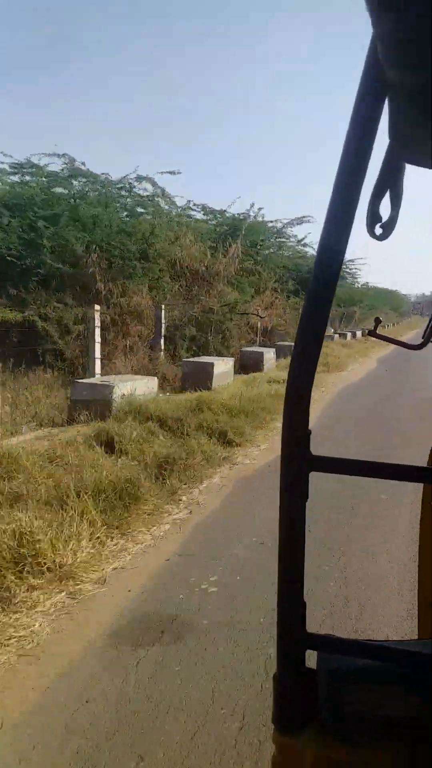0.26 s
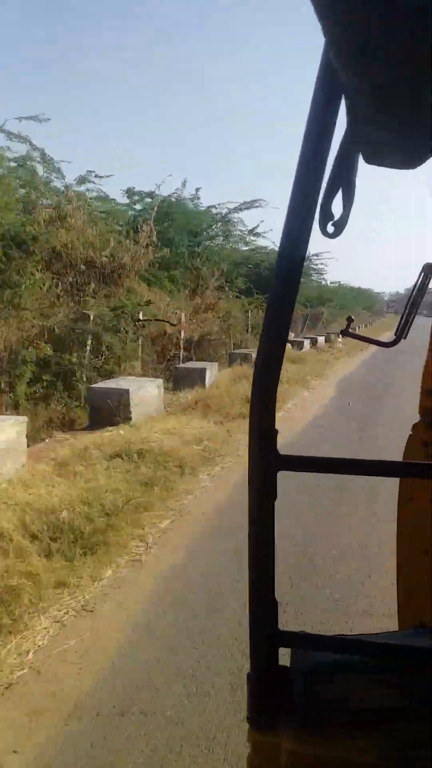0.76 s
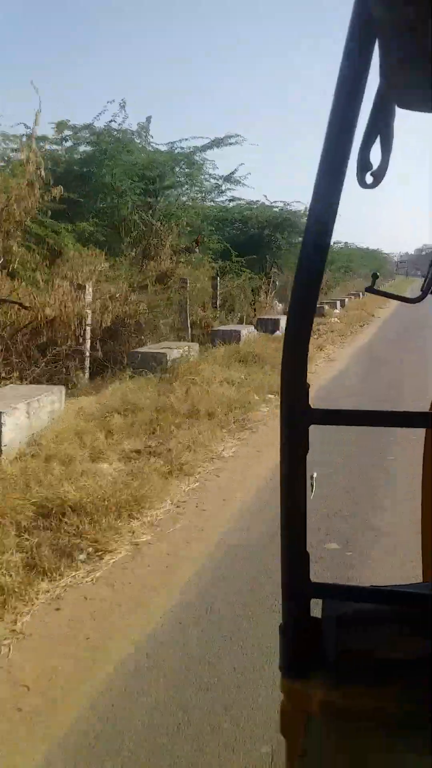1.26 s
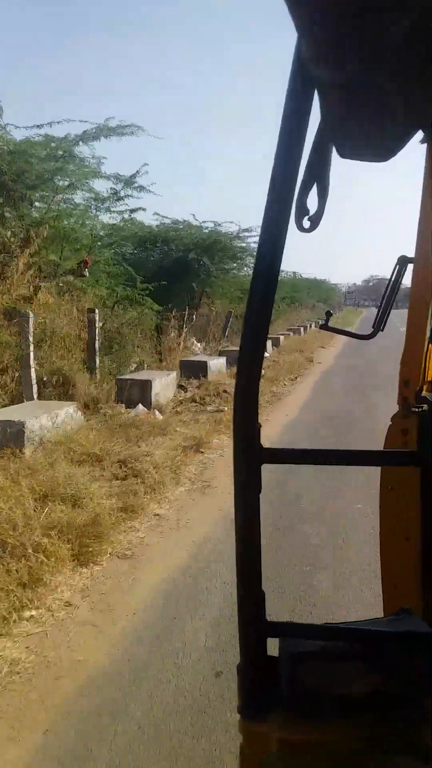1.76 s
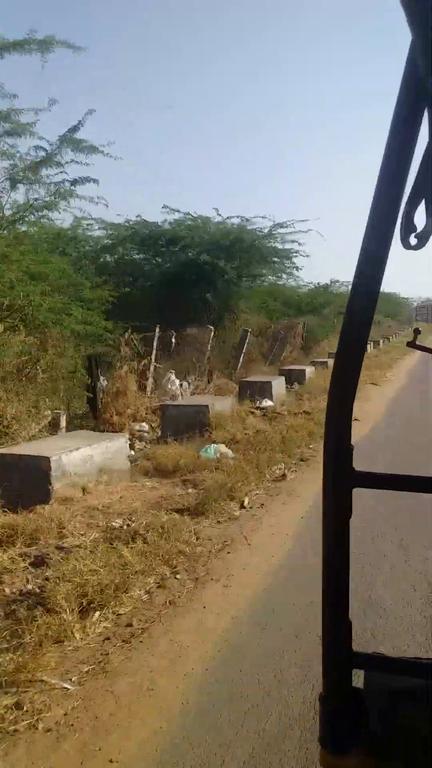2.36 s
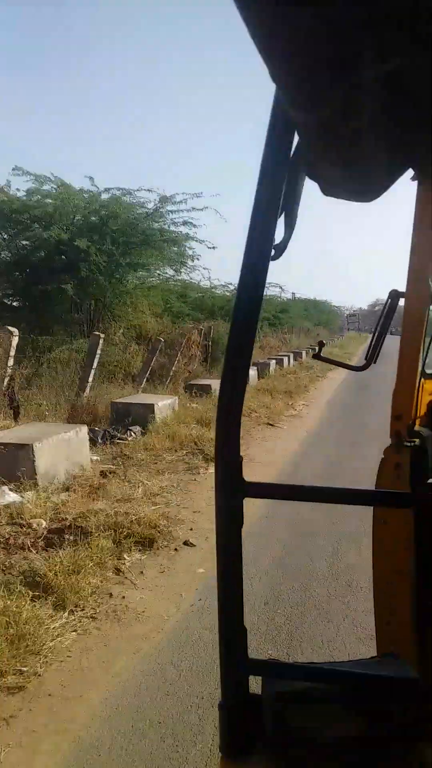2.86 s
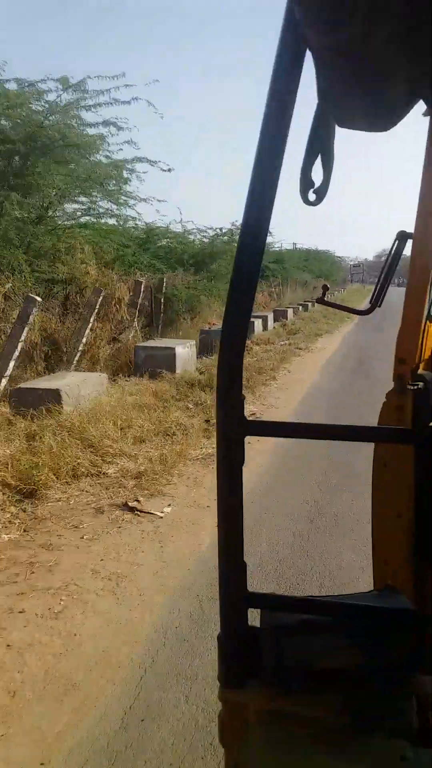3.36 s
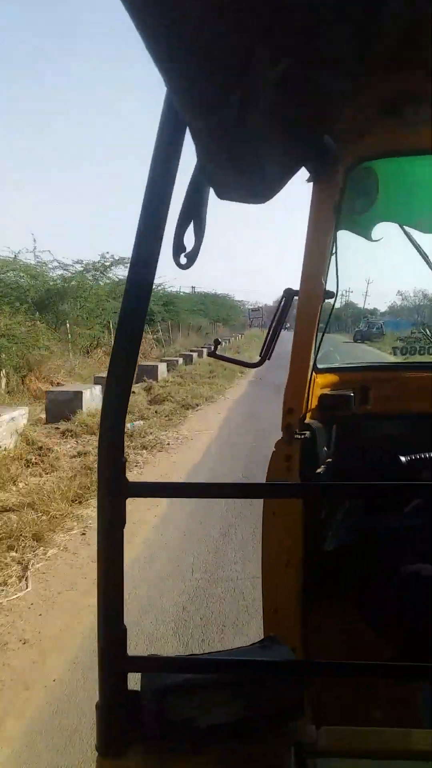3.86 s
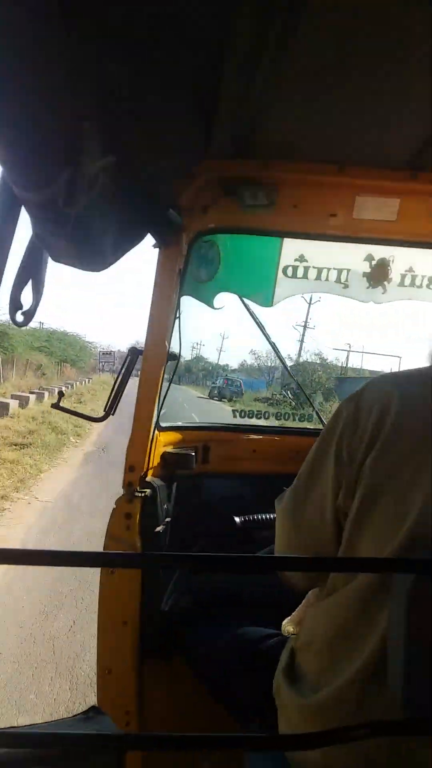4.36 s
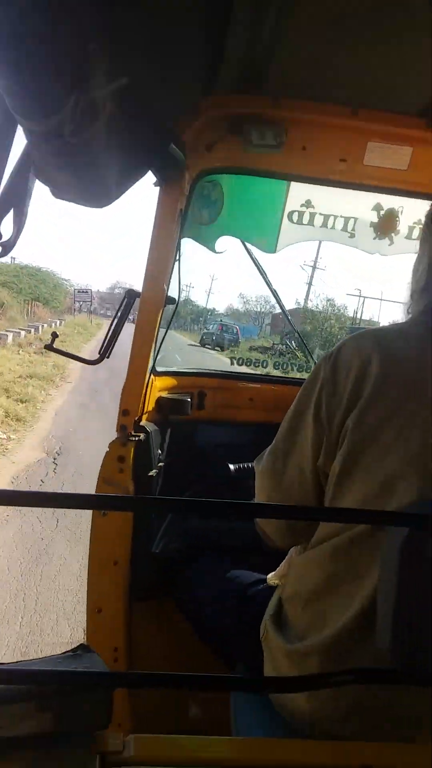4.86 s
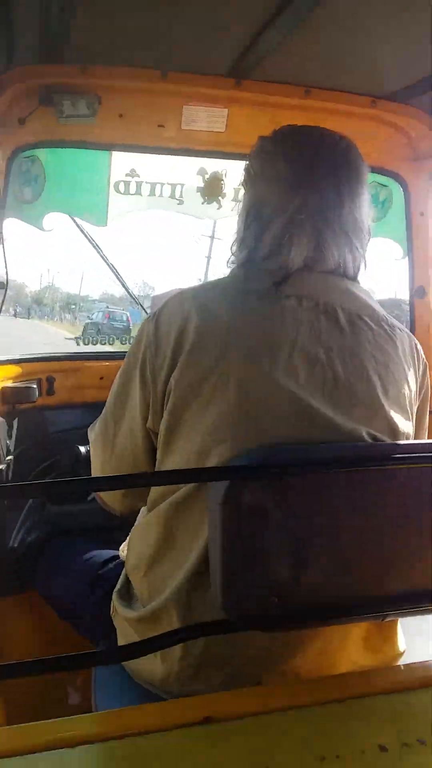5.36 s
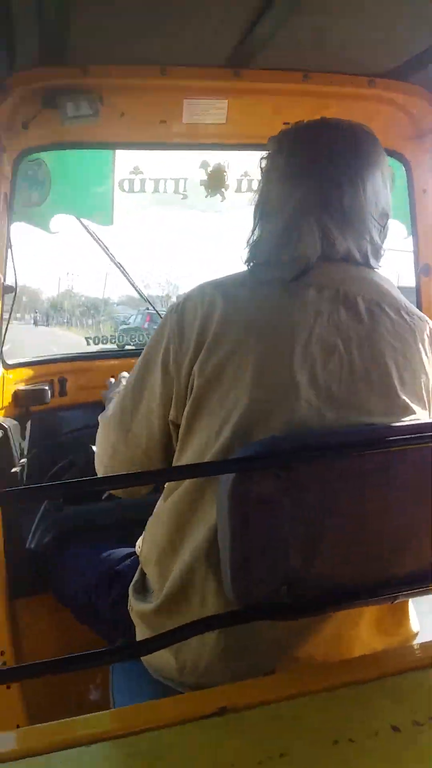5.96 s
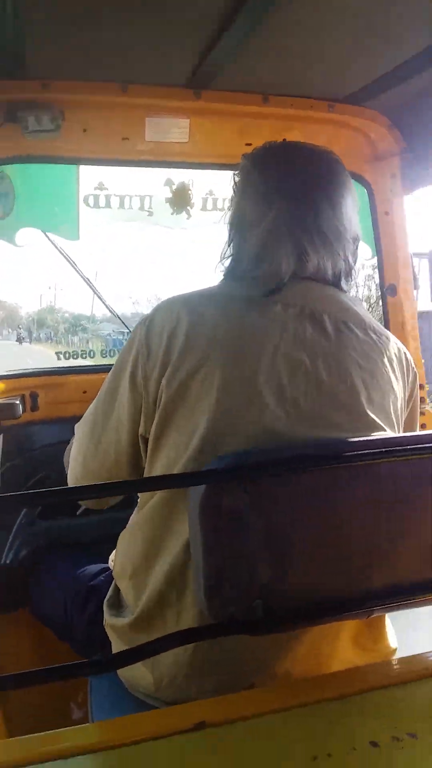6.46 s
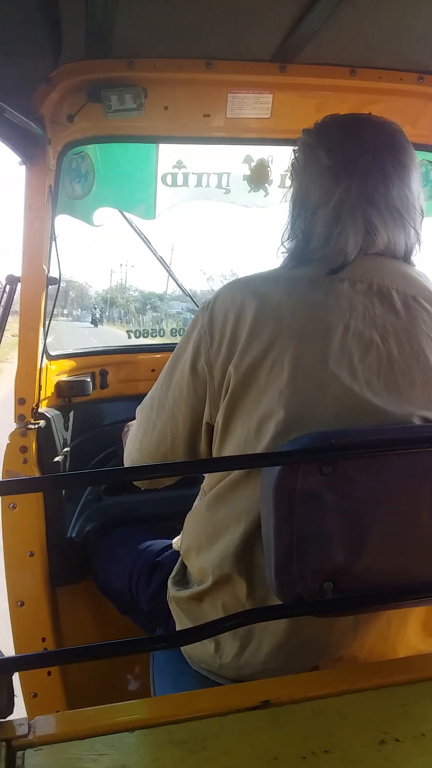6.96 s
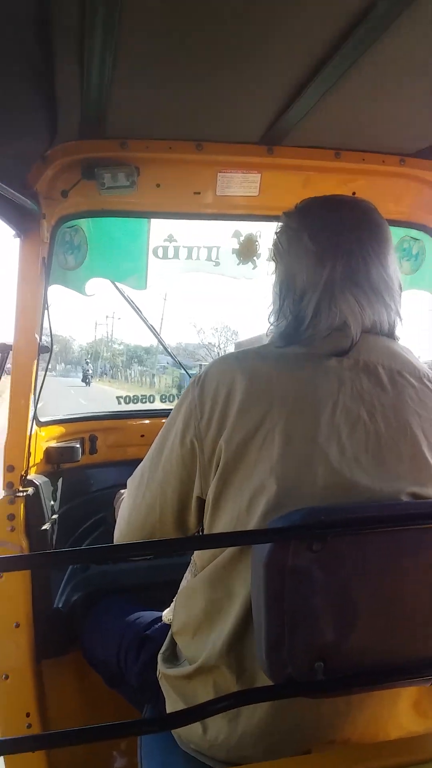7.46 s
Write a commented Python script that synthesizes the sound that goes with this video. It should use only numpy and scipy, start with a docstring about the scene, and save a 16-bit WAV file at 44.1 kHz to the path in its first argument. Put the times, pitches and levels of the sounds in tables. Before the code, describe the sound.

From the passenger bench of an open three-wheeler, a small single-cylinder engine drones steadily with a rapid putter and metallic panel clatter. Tyre and air hiss lies underneath. Wind rumbles on the phone microphone and hits it in short, irregular, distorted bumps, thickest around one second, four to five seconds and just before seven. The engine eases slightly at the end.

```python
"""The open cabin of an auto-rickshaw cruising along a country road, heard from the passenger bench.
The single-cylinder engine drones in harmonics of its firing rate and clatters through casing and panel resonances.
Tyre and air noise is a shaped hiss; small fittings tick in short bursts of thin noise.
The slipstream carries eddies past the microphone: they rumble, and hit it in short, ragged buffets
that run into the limiter."""
import sys
import numpy as np
from scipy import signal
from scipy.fft import rfft, irfft
from scipy.io import wavfile
from scipy.ndimage import uniform_filter1d, minimum_filter1d, map_coordinates

SR = 44100
rng = np.random.default_rng(int(sys.argv[2]) if len(sys.argv) > 2 else 0)


def output_pcm(signal):
    """Save a mono or channel-first signal as 16-bit PCM at the path in sys.argv[1].

    Samples are clipped to [-1, 1] before scaling.
    """
    pcm = np.clip(np.atleast_2d(signal).T, -1, 1) * 32767
    wavfile.write(sys.argv[1], SR, np.round(pcm).astype(np.int16))


N = 339129   # length of the scene in samples
EDDY_SIZE = 32   # scale of the eddy patterns in samples

# Gusts that hit the microphone. Each row: nominal time in seconds, relative level in dB,
# corner frequency in Hz, length in seconds, relative level of the dull wake in dB.
BUFFETS = [(0.001, -19, 790.0, 0.0092, -10.5), (0.166, -17, 1067, 0.0019, -8),
           (0.396, -13, 710.0, 0.0046, -5), (0.482, -9.5, 1210, 0.008, -17),
           (0.589, -13.5, 1302, 0.016, -5), (0.735, -4.5, 1020, 0.006, -4.5), (0.792, -15, 492, 0.0027, -7),
           (0.846, -1.0, 1121, 0.017, -2.5), (0.896, -11, 1320, 0.0016, -10),
           (0.97, -5.5, 370.0, 0.0021, -10), (1.041, -12, 1190, 0.02, -10), (1.079, -2.5, 1444, 0.013, -3),
           (1.17, -5.5, 803, 0.0024, -3), (1.516, -6.5, 1014, 0.0095, -1), (1.571, -7.5, 604, 0.0053, -9),
           (1.811, -10, 807, 0.0038, 1), (2.029, -7.5, 749.4, 0.0022, -12),
           (2.161, -5.5, 1469, 0.014, -3.5), (2.263, -7.5, 837, 0.009, -9),
           (2.324, -5.5, 1490.0, 0.005, -4.5), (2.503, -4.5, 1108, 0.0035, -1.5),
           (2.763, -10, 1006, 0.0017, -2.0), (3.044, -14.5, 885, 0.002, -4.5),
           (3.138, -11.5, 965, 0.0089, -4), (3.277, -8.5, 715, 0.03, -5.5),
           (3.457, -11.5, 854.5, 0.012, -20), (3.771, -8.5, 1163, 0.0077, -14.0),
           (3.998, -12.5, 676, 0.013, -1), (4.059, -4.5, 1046, 0.0028, -3), (4.092, -3.5, 1114, 0.0058, 1),
           (4.189, -5.5, 1077, 0.006, -5), (4.225, -10, 589, 0.0027, 0), (4.299, -12, 1024, 0.0047, -4.5),
           (4.459, -11, 920, 0.006, -7.5), (4.643, -14.5, 1439, 0.002, 1.0), (4.852, -5, 528, 0.006, -3),
           (4.933, -4.5, 1388, 0.004, -8.5), (5.002, -4.5, 1585, 0.0083, 5), (5.11, -5, 1256, 0.019, 3.5),
           (5.144, -1, 973, 0.02, -1.0), (5.532, -6, 867, 0.0022, -11), (5.609, -12, 813, 0.0038, -10),
           (5.705, -6.5, 684, 0.011, -1.5), (5.863, -15, 893, 0.002, -9), (6.321, -8.5, 1028, 0.0034, -7),
           (6.354, -6.5, 797, 0.0054, -5), (6.401, -3.5, 603, 0.0059, -7.5),
           (6.523, -7.5, 1097, 0.0035, -1), (6.658, -3.5, 1563, 0.014, 5.5), (6.771, -1.5, 1263, 0.01, 7.5),
           (6.836, -6, 551, 0.0041, -5), (6.94, 0, 1235, 0.02, -2), (6.976, -10, 1534, 0.0093, -3),
           (7.067, -9.0, 1240, 0.0028, -28), (7.172, -11, 1079, 0.0068, -10),
           (7.445, -5.0, 1255, 0.0065, -0.5)]


def from_db(db):
    """Amplitude factor for a level in dB."""
    return 10 ** (np.asarray(db) / 20)


def rms_one(x):
    """Scale a signal to an rms of 1."""
    return x / np.sqrt(np.mean(x ** 2) + 1e-20)


def in_time(rows):
    """One curve per column after the first (seconds), interpolated sample by sample."""
    s, *columns = np.transpose(rows)
    return [np.interp(np.arange(N) / SR, s, column) for column in columns]


def butter(x, hz, kind, order):
    """Causal low- or high-pass."""
    return signal.sosfilt(signal.butter(order, hz, kind, fs=SR, output="sos"), x)


def drift(rate_hz):
    """Slow chance with a spread of 1: noise that falls off above the given rate."""
    hz = np.arange(N // 2 + 1) * SR / N
    return rms_one(irfft(rfft(rng.standard_normal(N)) / (1 + (hz / rate_hz) ** 2), N))


def coloured_noise(spectrum):
    """Noise with the given spectrum, interpolated over log frequency; rms 1."""
    hz = np.arange(1, N // 2 + 2) * SR / N   # starts above 0 for the logarithm
    points_hz, points_db = np.transpose(spectrum)
    gain = from_db(np.interp(np.log(hz), np.log(points_hz), points_db))
    return rms_one(irfft(rfft(rng.standard_normal(N)) * gain, N))


def resonate(x, hz, width_hz):
    """One resonance with gain 1 on top."""
    r = np.exp(-np.pi * width_hz / SR)
    numerator = [(1 - r * r) / 2, 0, (r * r - 1) / 2]
    return signal.lfilter(numerator, [1, -2 * r * np.cos(2 * np.pi * hz / SR), r * r], x)


def through(force, modes):
    """A bank of resonances side by side, with alternating sign."""
    out = np.zeros(N)
    for k, (hz, width_hz, db) in enumerate(modes):
        out += (-1) ** k * from_db(db) * resonate(force, hz, width_hz)
    return out


def road_noise(hiss_db):
    """Tyre and air noise: a steady spectrum whose level follows the ride."""
    # Each row: frequency in Hz, relative level per Hz in dB.
    road_spectrum = [(60, 23.5), (200, 31.5), (600, 22), (1300, 14), (2200, 15), (2800, 5), (3700, 5.5),
                     (4600, 0.5), (6300, -3.5), (7700, 0), (10000, 8), (12500, 0), (15500, -7)]
    return from_db(hiss_db + 20.5) * coloured_noise(road_spectrum)


def ticks(level_db, t60, low_hz):
    """Small metal parts touch with a short, thin crack; each falls by 60 dB in t60 seconds."""
    # Each row: start in seconds, relative level in dB.
    touches = [(2.617, -48), (4.948, -43), (5.8691, -45.5), (7.1133, -46)]
    out, age = np.zeros(N), np.arange(SR // 20) / SR
    for s, db in touches:
        start = int(s * SR)
        decay = from_db(db + level_db - 60 * age / t60)
        out[start:start + len(age)] += decay * rng.standard_normal(len(age))
    return butter(out, low_hz, "high", order=2)


def drone(cycle, level_db, waver_db, wobble):
    """Exhaust and cabin: harmonics of the firing rate; each wavers as the load and the cabin shake."""
    # Each row: multiple of the firing rate, relative rms level in dB.
    harmonics = [(2, -45), (3, -50.5), (4, -37), (5, -33.5), (6, -39), (7, -36), (8, -42), (9, -49),
                 (11, -32.5), (12, -47), (13, -35), (15, -46.5), (16, -49.5), (18, -44.5), (20, -42.5)]
    out = np.zeros(N)
    turned = cycle + wobble * drift(2.4)
    for multiple, db in harmonics:
        level = from_db(db + waver_db * drift(4.9))
        out += level * np.sin(2 * np.pi * (multiple * turned + rng.random()))
    return from_db(level_db) * np.sqrt(2) * out


def knock(cycle, at, length):
    """A rounded burst once a cycle, centred on the share `at` of it."""
    distance = (cycle - at + .5) % 1 - .5
    return np.exp(-.5 * (distance / length) ** 2)


def clatter(cycle, valve_db, between_db, uneven_db, direct_db, panels_db):
    """Combustion knock and valve gear shake casing and panels, a little differently on every stroke."""
    # Ringing of the engine casing and panels. Each row: frequency in Hz, width in Hz, relative level in dB.
    casing_modes = [(460, 66, 7), (666, 100, -11), (1084, 140, -7), (1653, 380, -1), (2007, 320, -2),
                    (2393, 127, 0.5), (3013, 300, -7.5), (3847, 154, -4), (5770, 96, -18),
                    (8200, 610, -42.5)]
    # Panels that sing inside the cabin. Each row: frequency in Hz, width in Hz, relative level in dB.
    panel_modes = [(561, 9.1, 5), (725, 20, 0), (1170, 21, -10.5), (1902, 17, -0.5), (1933, 5.3, -5),
                   (2290, 35, -18.5)]
    # How far the microphone faces into the cabin. Each row: time in seconds, share from 0 to 1.
    facing_curve = [(0, 0.95), (3.8, 0.28), (5.2, 0.73), (7.69, 1)]
    combustion = knock(cycle, at=0.37, length=0.074)
    valves = from_db(valve_db) * knock(cycle, at=0.66, length=0.18)
    strokes = (combustion + valves) * from_db(uneven_db * drift(25))
    force = (strokes + from_db(between_db)) * rng.standard_normal(N)
    casing = rms_one(through(force, casing_modes) + from_db(direct_db) * force)
    panels = rms_one(through(force, panel_modes))
    return casing + from_db(panels_db) * in_time(facing_curve)[0] * panels


def engine(clatter_db):
    """One firing cycle drives both the tonal drone and the noisy clatter."""
    # Engine speed. Each row: time in seconds, firings per second.
    firing_curve = [(0, 23.8), (.75, 21.5), (1.25, 23), (2.75, 23.1), (3.8, 23.1), (5.2, 24.6), (6, 22.6),
                    (7.69, 20.6)]
    cycle = np.cumsum(in_time(firing_curve)[0]) / SR
    tonal = drone(cycle, level_db=-2.04, waver_db=4.0, wobble=0.0018)
    rattling = clatter(cycle, valve_db=-1.0, between_db=0.0, uneven_db=-3.5, direct_db=-19.5, panels_db=-3.5)
    return tonal + from_db(clatter_db + 0.66) * rattling


def eddies(swirl, corner_hz, largest, finest):
    """Frozen eddy patterns, one a row, are carried past the port: the faster the flow, the higher the corner."""
    corner = SR / EDDY_SIZE   # corner of the pattern when carried at one sample per sample
    pattern = butter(swirl, corner, "low", order=3)
    pattern = butter(pattern, largest * corner, "high", order=1)
    pattern = butter(pattern, finest * corner, "low", order=3)   # viscosity wipes out the finest swirls
    rows, length = pattern.shape
    travelled = np.cumsum(corner_hz, axis=1) / corner % length
    travelled = travelled + length * np.arange(rows)[:, None]   # rows lie end to end
    return map_coordinates(pattern.ravel(), [travelled], order=1)


def rumble(level_db, corner_hz, lumpy_db, brightening):
    """The restless slipstream: pressure goes with the square of its speed, and gusts are brighter."""
    flow = from_db(lumpy_db * np.tanh(drift(40.12) / 2))
    gust = from_db(brightening * (level_db - level_db.mean()))
    swirl = rng.standard_normal((1, N))
    pressure = flow ** 2 * eddies(swirl, [corner_hz * flow * gust], largest=0.21, finest=4.15)[0]
    return from_db(level_db) * rms_one(pressure)


def stray_eddies(wind_db, above_db, spread_db, corner_hz, octaves, scatter_s, count=280):
    """Small eddies flock around the big ones, stronger in the gusts: rows (s, level dB, corner Hz)."""
    strength, fineness = rng.uniform(-0.88, 1, (2, count))
    s = np.resize(np.array(BUFFETS)[:, 0], count) + rng.laplace(0, scatter_s, count)
    s = np.clip(s, 0, (N - 1) / SR)
    db = wind_db[(s * SR).astype(int)] + above_db + spread_db * strength
    return np.column_stack([s, db, corner_hz * 2 ** (octaves * fineness)])


def break_up():
    """Each buffet arrives as a handful of eddies of different size: rows (s, level dB, corner Hz)."""
    s, db, corner_hz, length, wake_db = np.transpose(BUFFETS)
    octaves = np.log2(corner_hz / 1000)
    lead = [s, db - 1.5, corner_hz]
    # part of the way through, the flow tears with a fine crackle, stronger in bright buffets
    tear = [s + 0.6 * length, db - 14 + 10 * octaves, corner_hz * 2 ** 0.74]
    trail = [s + length, db - 1.4, corner_hz * 2 ** -0.25]
    wake = [s + 0.3965 * length, wake_db, np.full(len(s), 235.3)]   # large and dull
    late_s = 0.016 * rng.uniform(.5, 1.5, len(s))
    straggler = [s + length + late_s, db - 9.5, corner_hz * 2 ** -0.55]
    return np.hstack([lead, tear, trail, wake, straggler]).T


def buffets(rows, level_db, rise_s, life_s, life_law, slowing, front_db):
    """Each eddy builds quickly to a pressure front, then its wake slows and dies; small, bright eddies die soonest."""
    s, db, corner_hz = np.transpose(rows)[:, :, None]
    lead = SR // 80   # samples ahead of the front
    age = np.arange(-lead, SR // 24) / SR
    life = life_s * (600 / corner_hz) ** life_law
    swell = np.exp(np.minimum(age / rise_s, -age / life))
    speed = corner_hz * swell ** slowing
    swirl = rng.standard_normal(swell.shape)
    # place one strong swirl where the flow has carried the pattern by age 0
    front = (speed[:, :lead].sum(axis=1) * EDDY_SIZE / SR).astype(int)
    swirl[np.arange(len(rows)), front] = rng.choice([-1, 1], len(rows)) * from_db(front_db)
    pressure = swell * eddies(swirl, speed, largest=0.066, finest=7.0)
    # give each burst the energy of its swell
    energy_match = np.linalg.norm(swell, axis=1) / np.linalg.norm(pressure, axis=1)
    pressure *= from_db(db + level_db) * energy_match[:, None]
    starts = (np.maximum(s[:, 0] + rise_s / 2, 0) * SR).astype(int)
    out = np.zeros(N + SR)
    for start, burst in zip(starts, pressure):
        out[start:start + len(age)] += burst
    return out[lead:lead + N]


def slipstream():
    """Wind at the microphone: a rumble between the buffets, the broken-up buffets and stray eddies."""
    # Strength of the slipstream. Each row: time in seconds, relative level in dB.
    wind_curve = [(0.0, -25), (0.23, -26), (0.51, -20.5), (0.96, -19), (1.24, -24), (2.01, -25),
                  (2.21, -22), (3.19, -26), (4.09, -21), (4.48, -23), (4.95, -19), (5.31, -24), (6.15, -27),
                  (6.55, -20), (6.9, -18.5), (7.37, -23), (7.5, -27), (7.69, -28)]
    wind_db = in_time(wind_curve)[0]
    wind = rumble(wind_db - 0.2, corner_hz=214.9, lumpy_db=4.5, brightening=.3)
    strays = stray_eddies(wind_db, above_db=1.0, spread_db=8.5, corner_hz=797.3, octaves=.8, scatter_s=.06)
    passing = np.vstack([break_up(), strays])
    return wind + buffets(passing, level_db=-3.5, rise_s=.003, life_s=0.00822, life_law=0.38,
                          slowing=.3, front_db=14)


def scene():
    """Road, fittings, engine and wind as they meet on the passenger bench."""
    # The ride. Each row: time in seconds, relative engine clatter in dB, relative tyre and air hiss in dB.
    ride_curve = [(0, -45.5, -55.5), (.9, -38.5, -50), (1.3, -40, -53), (2.1, -42, -52), (3.1, -39.5, -51),
                  (4, -36.5, -48.5), (4.9, -38, -50), (5.95, -40, -52), (6.8, -38.5, -50),
                  (7.69, -48, -53.5)]
    clatter_db, hiss_db = in_time(ride_curve)
    road = road_noise(hiss_db)
    fittings = ticks(level_db=23.5, t60=0.037, low_hz=8200)
    return (road + fittings + engine(clatter_db) + slipstream())[None]


def record(dry):
    """The phone drops the deep bass, limits the strongest buffets and passes little above 8 kHz."""
    x = butter(dry, 61.4, "high", order=6)
    room = 1 / np.maximum(np.abs(x), 1)   # the gain that keeps a peak at full scale
    x = x * uniform_filter1d(minimum_filter1d(room, size=65), size=65)
    faint_top = from_db(-20.0) * butter(x, 12750, "high", order=4)
    x = butter(x, 7735, "low", order=12) + faint_top
    return signal.sosfilt(signal.ellip(10, .2, 90, 15900, fs=SR, output="sos"), x)   # steep upper limit


dry = scene()
out = record(dry)
output_pcm(out)
```